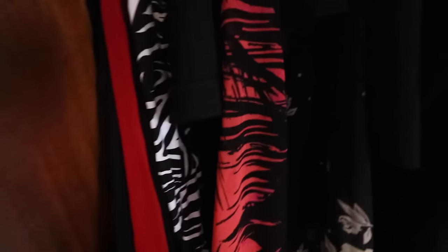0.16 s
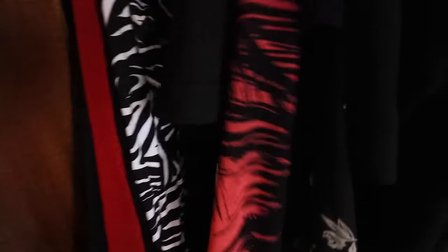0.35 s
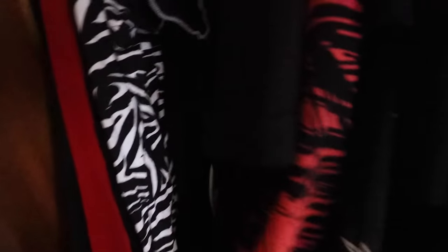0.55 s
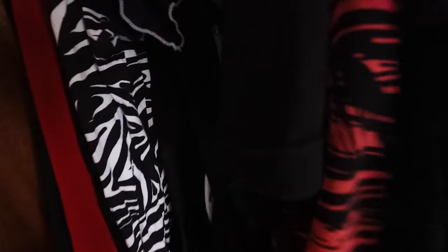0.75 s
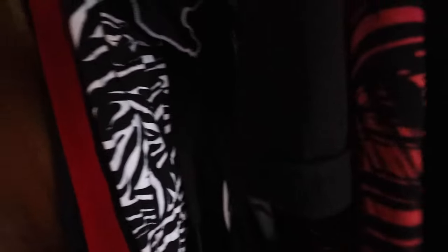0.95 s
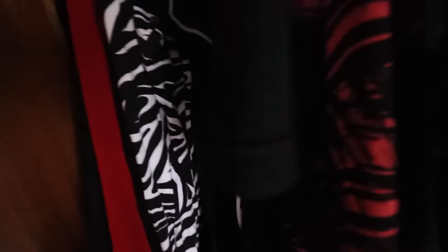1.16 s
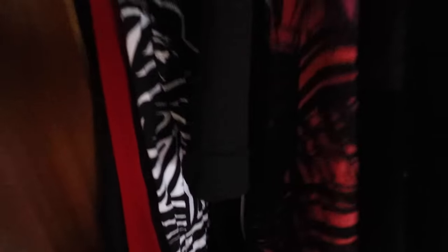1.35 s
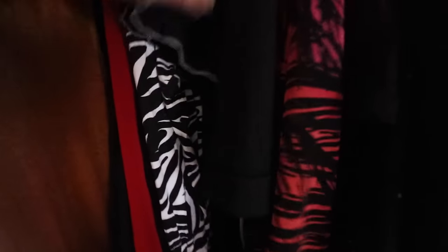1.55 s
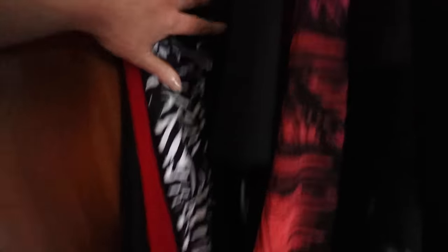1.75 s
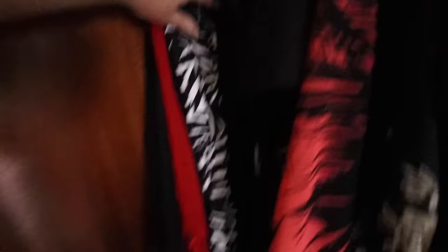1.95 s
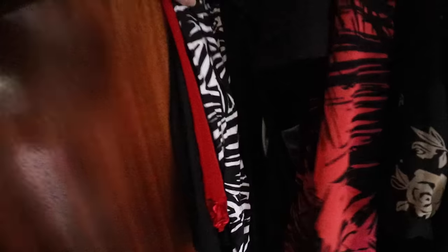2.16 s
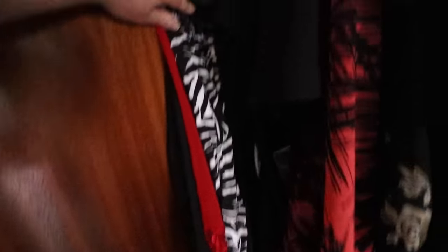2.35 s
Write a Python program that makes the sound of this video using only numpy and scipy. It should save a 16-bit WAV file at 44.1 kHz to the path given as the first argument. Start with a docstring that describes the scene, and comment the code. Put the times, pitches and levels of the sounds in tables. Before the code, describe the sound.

After a brief hook creak, hanging clothes are shoved aside: bright wire clinks and grinding in two quick bursts, settling into faint knocks, cloth rustle, light taps and one late tick, heard close indoors.

```python
"""Metal hangers clink in two bursts as clothes are pushed along the rail of a wooden wardrobe.
Clinks and hollow knocks are noise through resonances and decaying modes. A hook creaks, squeals
and ticks once; hooks grind along the rail as random contacts that excite its modes.
Resonant noise gives the rumble of the panels, dense fine contacts the rustle of the garments;
light taps and a quiet room complete the scene."""
import sys
import numpy as np
from scipy import signal
from scipy.fft import rfft, irfft
from scipy.io import wavfile
from scipy.ndimage import uniform_filter1d

SR = 44100
rng = np.random.default_rng(int(sys.argv[2]) if len(sys.argv) > 2 else 0)


def materialize(psi):
    """Save the field psi as 16-bit PCM at rate SR to the path in sys.argv[1].

    A 1-D psi becomes a single channel; in a 2-D psi each row is a channel.
    """
    bounded = np.clip(np.atleast_2d(psi).T, -1, 1)
    quanta = np.round(bounded * 32767).astype(np.int16)
    wavfile.write(sys.argv[1], SR, quanta)


N = 105840
T = np.arange(N) / SR

# Hangers strike each other: [t/s, body level/dB, wire level/dB, wire pitch ratio, left-right level/dB]
CLINKS = [(0.3903, -14.5, -6.5, 1.006, -2.5), (0.4049, -13, -13.5, 1.15, -2.5), (0.425, -31, -36, 1.0, 0),
          (0.4584, -15, -8.5, 1.09, -0.5), (0.5388, -20, -10.5, 1.02, -2.5), (0.579, -44, -32, 1.03, 2),
          (0.7302, -34.5, -52, 0.76, -2), (0.743, -26.5, -15, 1.23, -1.5), (0.766, -20.5, -16, 1.14, -4),
          (0.7739, -21.5, -17.5, 0.89, -3.5), (0.7788, -21.5, -18.5, 1.4, -7.5),
          (.8015, -36, -33.5, 1.1, 1)]
# Resonances of the wire hook: [f/Hz, width of one filter stage/Hz, level/dB]
WIRE_RESONANCES = [(6860, 310, -6.5), (7340, 180, 3), (8050, 310, -3.5), (9230, 270, -6.5),
                   (10260, 410, -5), (11640, 460, -8), (13300, 3900, -17.5)]
# Spectrum of the hanger body's clack: [f/Hz, level/dB]
BODY_SPECTRUM = [(200, -25), (600, -13), (800, -14), (1050, -18.5), (1400, 0), (2100, -1), (3300, -3.5),
                 (4200, -11), (5500, -14.5), (8000, -7), (15000, -15.5)]
# Modes of the rail, rung by every clink and by the sliding hooks: [f/Hz, level/dB]
RAIL_MODES = [(752, -7.5), (817, -4), (1416, 1), (1722, -9), (2002, -3.5), (2192, 4), (2740, -2),
              (3070, -10), (7376, 0), (7950, 13), (12065, 2)]
# Hanger shoulders knock together: [t/s, level/dB, f/Hz]
NUDGES = [(0.3907, -14, 2040), (.4010, -24, 1370), (0.4056, -25.5, 2760), (.4425, -24, 3150),
          (.4465, -24, 826), (.4505, -24, 1640), (.4875, -34, 2680), (0.733, -32.5, 1450),
          (0.745, -29, 1390), (.7775, -26.5, 3530), (0.8002, -24, 2350), (.8220, -27, 1250),
          (.8715, -42, 1910), (0.8893, -35.5, 1240), (0.9277, -42, 1800), (.9590, -39, 1260),
          (.989, -45, 1400), (1.005, -36, 1865), (1.038, -41.5, 1100), (1.112, -43, 2490),
          (1.1925, -43, 2860)]
# Modes of a hanger's shoulder: [pitch ratio, level/dB, 60 dB decay time/s]
SHOULDER_MODES = [(1, 4.5, 0.044), (0.844, -4.5, 0.023), (1.17, -6, 0.026)]
# Resonances of a hook dragged on the rail: [f/Hz, width of one filter stage/Hz, level/dB]
HOOK_RESONANCES = [(830, 460, -19.5), (1380, 85, -8), (1860, 37, -4.5), (2150, 92, -2.5), (2423, 80, 4),
                   (2724, 72, 1.5), (3153, 156, -4), (4190, 150, -22), (7100, 2000, -27)]
# Faint squeals of the hook: [middle t/s, half length/s, level/dB, f/Hz]
SQUEALS = [(0.093, 0.021, -50, 2310), (0.144, 0.026, -47.5, 2640), (0.294, 0.024, -49, 2440),
           (1.642, 0.033, -52.5, 2900)]
# Modes of the hook's lone tick: [f/Hz, level/dB, 60 dB decay time/s]
TICK_MODES = [(130.6, -17.5, 0.12), (250, -22.5, .1), (1827, -3.5, 0.02), (2377, -2.5, 0.044),
              (2900, -14, 0.019), (3040, 0, 0.029), (4130, -0.5, 0.012), (6600, -6, 0.019)]
# Hooks grinding along the rail: [t/s, level/dB]
SLIDE_LEVEL = [(.33, -63), (.352, -40.5), (.385, -50.5), (.41, -29), (.438, -34.5), (.45, -26), (.468, -38),
               (.53, -40.5), (.6, -59.5), (.69, -57.5), (.75, -40.5), (.79, -34), (.85, -55.5),
               (1.03, -52.5), (1.08, -60.5), (1.4, -82)]
# Spectrum of the grinding, also of the knocks' dry clack: [f/Hz, level/dB]
SLIDE_SPECTRUM = [(300, -16), (850, 10), (1500, 6.5), (2200, 0), (3200, 5), (4300, -7.5), (10000, -9.5),
                  (16000, -23)]
# Rumble of the wardrobe's panels: [t/s, level/dB]
RUMBLE_LEVEL = [(0, -56.5), (.32, -54), (.37, -36.5), (.55, -37), (.66, -47.5), (.72, -43.5), (.79, -32.5),
                (.87, -44), (1.06, -46.5), (1.1, -62.5), (1.45, -59), (1.55, -54), (1.9, -72.5),
                (2.18, -50), (2.4, -81)]
# Resonances of the panels: [f/Hz, width/Hz, level/dB]
PANEL_RESONANCES = [(152.4, 7.6, 5), (241.4, 76, -0.5), (304.4, 73, 3.5), (379.6, 6.3, 0.5)]
# Bumps of heavy garments: [t/s, level/dB]
BUMPS = [(0.497, -41.5), (0.659, -45.5)]
# Cloth rubbing on cloth: [t/s, level/dB]
CLOTH_LEVEL = [(0, -55.5), (.3, -50), (.45, -67), (.65, -53.5), (1.03, -48.5), (1.32, -52), (1.42, -56.5),
               (1.53, -50), (1.8, -51.5), (1.92, -55.5), (2.17, -48), (2.4, -50)]
# Spectrum of the rustle: [f/Hz, level/dB]
CLOTH_SPECTRUM = [(150, -1), (500, 1.5), (1500, 1), (3000, -1.5), (5000, -7), (8000, -3.5), (10500, -2.5),
                  (13000, -13), (16000, -18)]
# The hand taps garments and hangers: [t/s, level/dB]
TAPS = [(1.103, -40.5), (1.494, -43.5), (1.538, -41), (2.177, -44)]
# Spectrum of the taps, also of the sleeve's swish: [f/Hz, level/dB]
TAP_SPECTRUM = [(150, -13), (900, 6.5), (3500, -0.5), (6000, -7.5), (14000, -15)]
# Spectrum of the quiet room: [f/Hz, level/dB]
ROOM_SPECTRUM = [(20, -20), (45, 2), (300, -5.5), (800, -13), (3000, -22), (5000, -29), (11000, -22.5),
                 (15000, -25.5)]
# Stereo spread: [f/Hz, side against mid level/dB]
SIDE_SPECTRUM = [(300, -5), (800, -4), (2000, -3), (6000, -1.5), (13000, 0.5)]

STRIKE_RISE_S, STRIKE_FALL_S, TAIL_FALL_S = 0.00062, 0.0028, 0.024
WIRE_FALL_S, BODY_TAIL_DB, WIRE_TAIL_DB = 0.0023, -16, -30.5
SOFT_DULLS = 1  # dB lost at 16 kHz per dB of softer wire ring
RAIL_DB, RAIL_FOLLOWS = -9, 1.5  # dB of rail ring per dB of blow: mostly hard blows ring it
RAIL_CYCLES = 124  # each rail mode dies by 60 dB within this many cycles
SOFT_RING_LOSS = 0.12  # further dB of ring lost per dB of a softer knock
NUDGE_RISE_S, NUDGE_FALL_S, NUDGE_CLACK_DB = 0.00099, 0.003, -6.5
CREAK_S, CREAK_LENGTH_S, CREAK_DB = 0.1992, 0.032, -26.5
CREAK_RISE_S, CREAK_FALL_S = 0.01, 0.0087
SLIPS_PER_S, SLIP_SPREAD_DB, SQUEAL_WIDTH_HZ = 1900, 1.5, 160
TICK_S, TICK_DB, TICK_FALL_S, TICK_CRACK_DB = 1.6438, -19, 0.0021, -21.5
GRINDS_PER_S, RAIL_WIDTH_HZ, SLIDE_RING_DB = 3500, 12.5, -9
RATTLES_PER_S, RATTLE_WIDTH_HZ, RATTLE_DB = 130, 320, -3  # rate for each mode, width for one stage
BUMP_HZ, BUMP_FALL_S = 57.7, 0.143
FIBRES_PER_S = 12000
SWISH_S, SWISH_HALF_S, SWISH_DB = 2.15, 0.058, -49
TAP_FALL_S = 0.0062
NUDGE_PAN_DB, HOOK_PAN_DB, SLIDE_PAN_DB, CLOTH_PAN_DB = -1.5, -2.5, -2.5, -1  # left against right
ROOM_DB = -53.5
CUTOFF_HZ = 15900


def clinks():
    """Impact excitation: a body clack, a wire ring duller on soft blows, and longer rail modes."""
    out = np.zeros((2, N))
    hardest_db = max(row[2] for row in CLINKS)
    wire_lowest_hz = WIRE_RESONANCES[0][0]
    for s, body_db, wire_db, pitch, pan_db in CLINKS:
        dulling = [(11000, 0), (16000, SOFT_DULLS * (wire_db - hardest_db))]
        wire = colour(resonate(noise(size=8192), WIRE_RESONANCES, pitch, order=2), dulling)
        wire = strike(wire, wire_db, WIRE_FALL_S, WIRE_TAIL_DB)
        body = strike(colour(noise(size=8192), BODY_SPECTRUM), body_db, STRIKE_FALL_S, BODY_TAIL_DB)
        add(out, s, (body + wire) * pan(pan_db))
        for hz, db in RAIL_MODES:
            # the wire drives the high modes, the body the low ones
            force_db = RAIL_FOLLOWS * (wire_db if hz > wire_lowest_hz else body_db)
            mode = ring(hz, RAIL_DB + db + force_db, RAIL_CYCLES / hz)
            add(out, s, pan(pan_db / 2) * mode)
    return out


def nudges():
    """Modal decay: hollow knocks ring on hard blows and are drier as the hangers swing to rest."""
    out = np.zeros((2, N))
    hardest_db = max(row[1] for row in NUDGES)
    for s, db, hz in NUDGES:
        ring_db = db + SOFT_RING_LOSS * (db - hardest_db)
        for ratio, mode_db, t60 in SHOULDER_MODES:
            add(out, s, ring(hz * ratio, ring_db + mode_db, t60, rise_s=NUDGE_RISE_S))
        clack = colour(noise(size=4096), SLIDE_SPECTRUM)
        add(out, s, strike(clack, db + NUDGE_CLACK_DB, NUDGE_FALL_S))
    return out * pan(NUDGE_PAN_DB)


def hook():
    """Stick-slip friction: runs of random slips creak and squeal, a single slip ticks."""
    attack = np.clip((T - CREAK_S) / CREAK_RISE_S, 0, 1)
    release = np.exp(-np.maximum(T - CREAK_S - CREAK_LENGTH_S, 0) / CREAK_FALL_S)
    slips = resonate(grains(SLIPS_PER_S, SLIP_SPREAD_DB), HOOK_RESONANCES, order=2)
    # dividing by the running rms evens out the creak
    running_rms = np.sqrt(uniform_filter1d(np.mean(slips ** 2, 0), size=1024) + 1e-6)
    out = from_db(CREAK_DB) * attack * release * slips / running_rms
    for s, half_s, db, hz in SQUEALS:
        squeal = resonate(grains(SLIPS_PER_S, SLIP_SPREAD_DB), [(hz, SQUEAL_WIDTH_HZ, 0)])
        out += swell(s, half_s, db) * squeal
    for hz, db, t60 in TICK_MODES:
        add(out, TICK_S, ring(hz, TICK_DB + db, t60))
    crack = colour(noise(size=4096), [(900, -1), (2000, 2), (10000, 3), (15000, -16)])
    add(out, TICK_S, strike(crack, TICK_CRACK_DB, TICK_FALL_S, tail_db=-25.5))
    return out * pan(HOOK_PAN_DB)


def slide():
    """Friction excitation: hooks grind, keep the rail's modes ringing and rattle on neighbours."""
    grind = rms_one(colour(grains(GRINDS_PER_S, spread_db=2.0), SLIDE_SPECTRUM))
    modes = resonate(grind, [(hz, RAIL_WIDTH_HZ, db) for hz, db in RAIL_MODES])
    rattle = 0
    for hz, _ in RAIL_MODES:
        if hz < WIRE_RESONANCES[0][0]:
            contacts = grains(RATTLES_PER_S, SLIP_SPREAD_DB)
            rattle = rattle + resonate(contacts, [(hz, RATTLE_WIDTH_HZ, 0)], order=2)
    mix = grind + modes * from_db(SLIDE_RING_DB) + rms_one(rattle) * from_db(RATTLE_DB)
    return level(SLIDE_LEVEL) * mix * pan(SLIDE_PAN_DB)


def wardrobe():
    """Structure-borne sound: the rail shakes the wooden panels; swinging garments bump softly."""
    lowpass = signal.butter(2, 750, fs=SR, output="sos")
    panels = resonate(noise(side_db=-8.5), PANEL_RESONANCES)
    out = level(RUMBLE_LEVEL) * rms_one(signal.sosfilt(lowpass, panels))
    bump_band = signal.butter(2, [BUMP_HZ / 2, BUMP_HZ * 2], "band", fs=SR, output="sos")
    for s, db in BUMPS:
        thud = signal.sosfilt(bump_band, noise(size=32768, side_db=-15))
        add(out, s, strike(thud, db, BUMP_FALL_S, rise_s=0.012))
    return out


def cloth():
    """Friction of many fibres: a fine rustle, and a duller swish as a heavy sleeve brushes past."""
    fibres = grains(FIBRES_PER_S, spread_db=3.5)
    rustle = level(CLOTH_LEVEL) * rms_one(colour(fibres, CLOTH_SPECTRUM))
    brush = rms_one(colour(noise(), TAP_SPECTRUM))
    swish = swell(SWISH_S, SWISH_HALF_S, SWISH_DB) * brush
    return (rustle + swish) * pan(CLOTH_PAN_DB)


def taps():
    """Damped impact: light touches of the hand are short, dry noise."""
    out = np.zeros((2, N))
    for s, db in TAPS:
        add(out, s, strike(colour(noise(size=4096), TAP_SPECTRUM), db, TAP_FALL_S))
    return out


def room():
    """Stationary noise: the quiet room is a steady, shaped random signal."""
    return from_db(ROOM_DB) * rms_one(colour(noise(), ROOM_SPECTRUM))


def strike(x, db, fall_s, tail_db=-60, rise_s=STRIKE_RISE_S):
    """Impulsive envelope: quick rise, fast fall and a weak tail from the wardrobe's inside."""
    t = T[:x.shape[-1]]
    fall = np.exp(-np.maximum(t - 2 * rise_s, 0) / fall_s)
    tail = from_db(tail_db) * np.exp(-t / TAIL_FALL_S)
    env = np.minimum(t / rise_s, 1) * (fall + tail)
    return from_db(db) * rms_one(x * env) * np.sqrt(np.mean(env ** 2))


def ring(hz, db, t60, rise_s=STRIKE_RISE_S, phase_spread=0.37):
    """Exponential decay of one struck mode, its phase differing a little from left to right."""
    t = T[:SR // 3]
    phase = rng.uniform(0, 2 * np.pi) + rng.normal(0, phase_spread, (2, 1))  # radians
    onset = np.minimum(t / (rise_s + 1 / hz), 1)
    return from_db(db - 60 * t / t60) * onset * np.sin(2 * np.pi * hz * t + phase)


def resonate(x, peaks, pitch=1, order=1):
    """Resonance: parallel two-pole filters [f/Hz, width/Hz, level/dB], cascaded by order; rms 1."""
    out = 0
    for hz, width, db in peaks:
        r = np.exp(-np.pi * width / SR)  # pole radius
        g = (1 - r * r) / 2  # near-unity gain at the peak
        stage = [g, 0, -g, 1, -2 * r * np.cos(2 * np.pi * hz * pitch / SR), r * r]
        out = out + from_db(db) * signal.sosfilt([stage] * order, x)
    return rms_one(out)


def grains(per_s, spread_db, grain_s=0.00077):
    """Random point process: tiny contacts of uneven size, each a short decaying spit of noise."""
    hits = rng.random(N) < per_s / SR
    sizes = hits * from_db(spread_db * np.minimum(rng.exponential(1, N), 4))
    # power adds where grains overlap
    power = signal.lfilter([1], [1, -np.exp(-2 / (grain_s * SR))], sizes ** 2 + 1e-12)
    return noise() * np.sqrt(power)


def noise(size=N, side_db=0):
    """Mid-side superposition: white mid noise with a side part that widens towards the treble."""
    mid, side = rng.standard_normal((2, size))
    return rms_one(mid + from_db(side_db) * colour(side, SIDE_SPECTRUM) * [[1], [-1]])


def colour(x, points):
    """Spectral filtering by [f/Hz, level/dB] points, joined linearly over log frequency."""
    hz, db = np.transpose(points)
    bins = np.log(np.fft.rfftfreq(x.shape[-1], 1 / SR) + 1)
    gain = from_db(np.interp(bins, np.log(hz), db))
    return irfft(rfft(x) * gain, x.shape[-1])


def swell(s, half_s, db):
    """Gaussian envelope: a bell-shaped gain, half_s being its standard deviation."""
    return from_db(db) * np.exp(-((T - s) / half_s) ** 2 / 2)


def level(rows):
    """Amplitude envelope: gain over time from [t/s, level/dB] points."""
    return from_db(np.interp(T, *np.transpose(rows)))


def pan(db):
    """Interaural level difference: left against right, shared equally by both channels."""
    return from_db(np.array([[db], [-db]]) / 2)


def from_db(db):
    """Logarithmic level: amplitude ratio from decibels."""
    return 10 ** (np.asarray(db) / 20)


def rms_one(x):
    """Effective value: scale a signal to unit rms."""
    return x / np.sqrt(np.mean(x ** 2) + 1e-20)


def add(out, s, x):
    """Superposition: mix a sound in at time s."""
    i = int(s * SR)
    out[:, i:i + x.shape[-1]] += x[:, :N - i]


def scene():
    """Superposition of all sources over the quiet room."""
    return clinks() + nudges() + hook() + slide() + wardrobe() + cloth() + taps() + room()


def record(dry):
    """Amplitude and band limits: peaks are clipped, then a steep low-pass cuts the top."""
    lowpass = signal.ellip(10, .2, 70, CUTOFF_HZ, fs=SR, output="sos")
    return signal.sosfilt(lowpass, np.clip(dry, -1, 1))


dry = scene()
out = record(dry)
materialize(out)
```